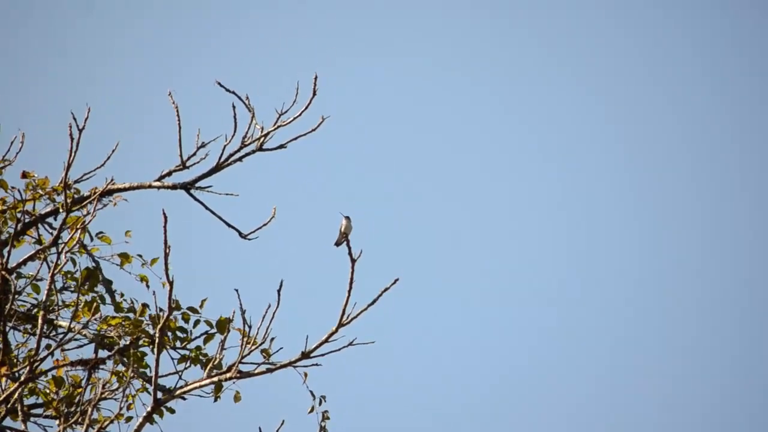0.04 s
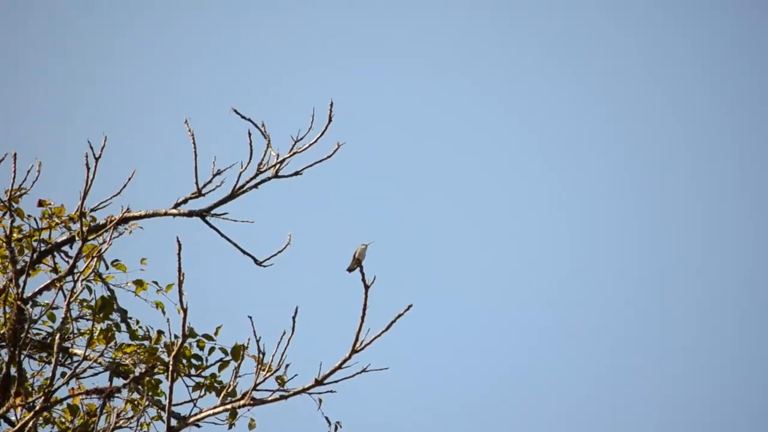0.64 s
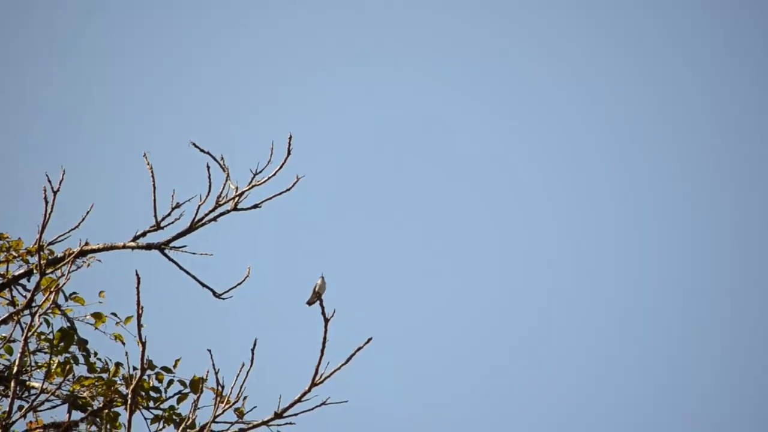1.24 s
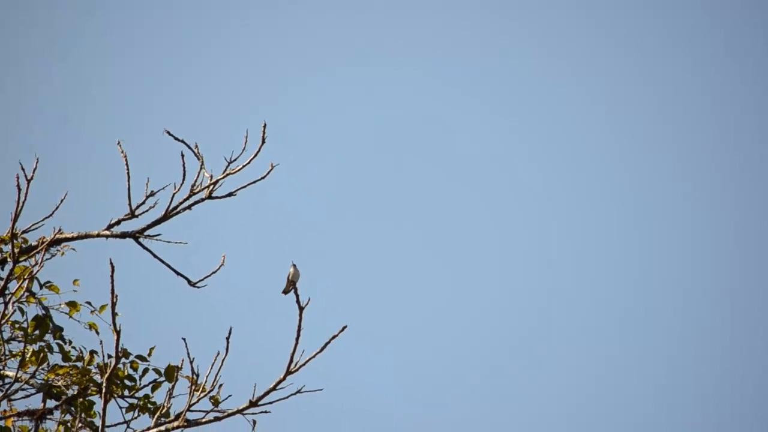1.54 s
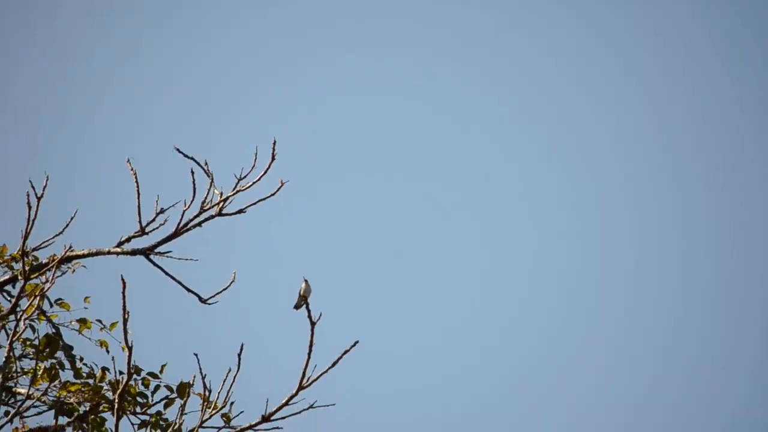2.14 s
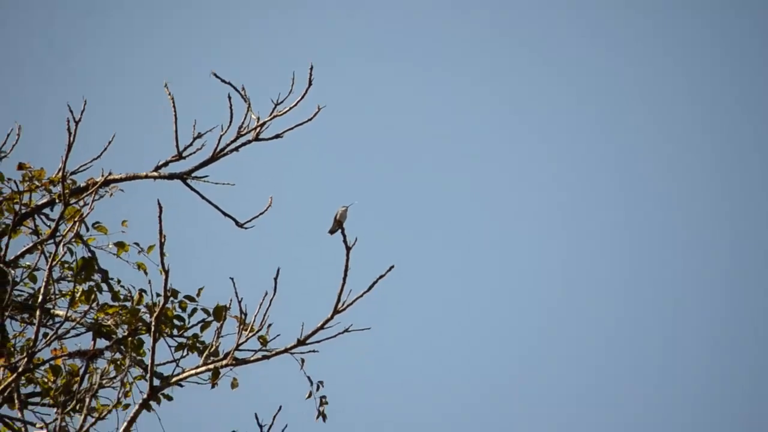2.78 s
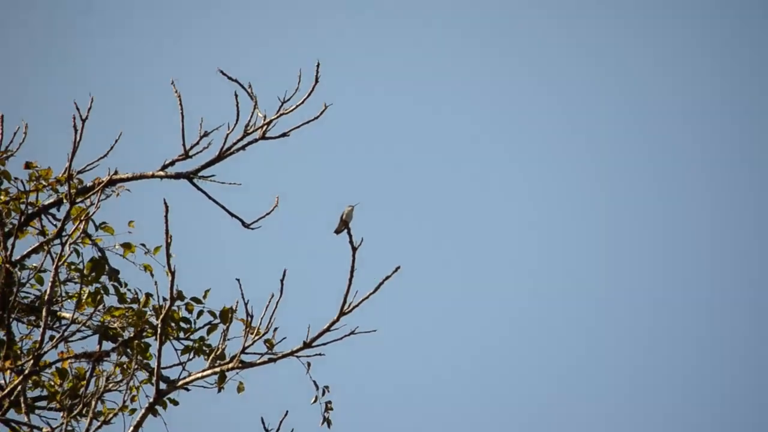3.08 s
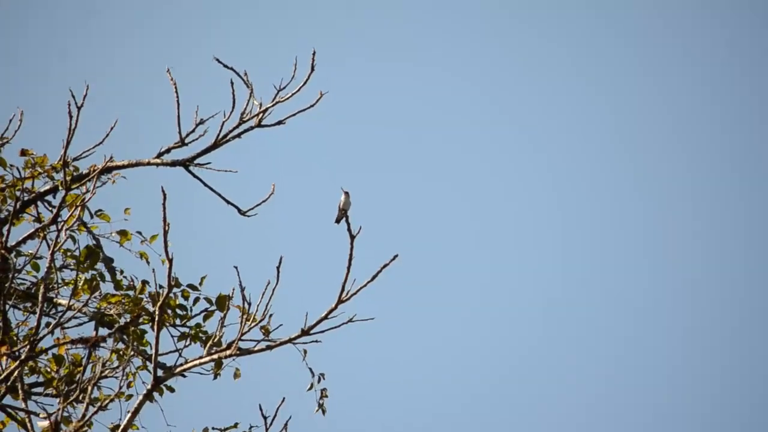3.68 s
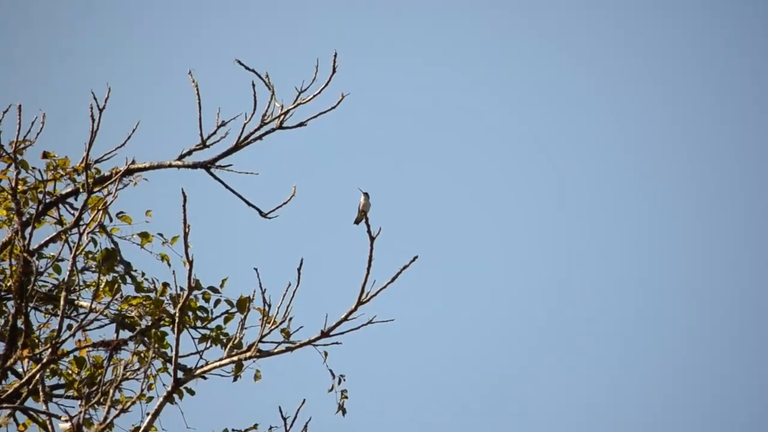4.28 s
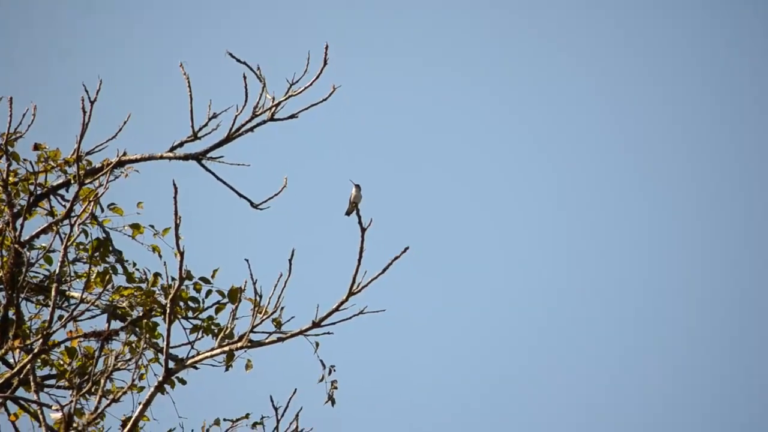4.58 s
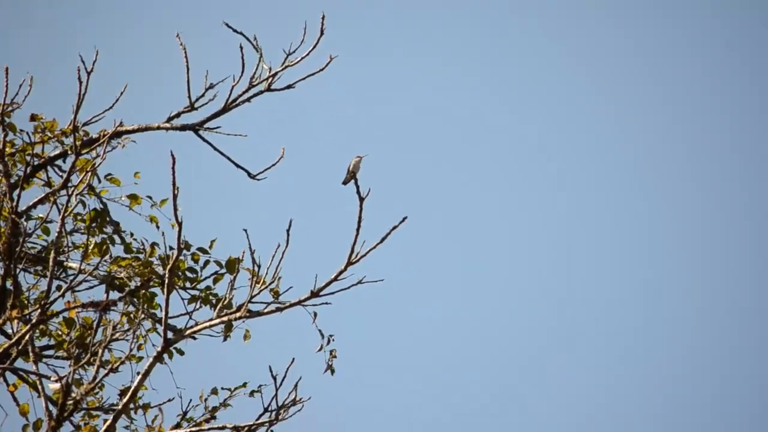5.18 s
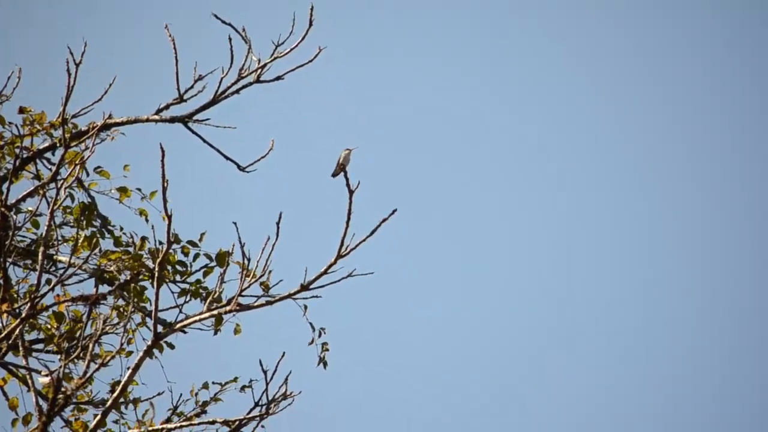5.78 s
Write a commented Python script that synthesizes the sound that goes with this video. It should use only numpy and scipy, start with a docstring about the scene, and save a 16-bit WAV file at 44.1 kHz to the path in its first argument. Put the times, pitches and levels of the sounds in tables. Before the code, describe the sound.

A perched hummingbird calls after about three seconds of quiet outdoor rush and faint far traffic. It makes one sharp, high buzz, then four thin, clean chips that drop in pitch, then two more sharp buzzes half a second apart. The trees add a light echo. The hand-held microphone contributes a faint hiss, a thin electronic whine and a few soft, low bumps.

```python
"""Outdoors among trees, a hand-held camera's microphone on a hummingbird perched on a bare twig.
After one faint call from afar, the bird gives a buzzy burst, four falling chips and two more bursts.
Each call is one thin whistle from the syrinx; in the bursts its pitch swings up and down ever more
slowly. The trees scatter a faint echo. Far behind lie an outdoor rush and a drone of traffic;
right at the microphone are its own hiss, the camera's whine and a few soft handling bumps."""
import sys
import numpy as np
from scipy import signal
from scipy.fft import rfft, irfft, next_fast_len
from scipy.io import wavfile
from scipy.ndimage import map_coordinates

SR = 44100
rng = np.random.default_rng(int(sys.argv[2]) if len(sys.argv) > 2 else 0)


def master(y):
    """Save y as 16-bit WAV."""
    cut = np.clip(np.atleast_2d(y).T, -1, 1)
    pcm = np.round(cut * 32767)  # scale
    wavfile.write(sys.argv[1], SR, pcm.astype(np.int16))


N = 261513


def amp(db):
    """Decibels to gain."""
    return 10 ** (np.asarray(db) / 20)


def unit(x):
    """Scale to rms 1."""
    return x / np.sqrt(np.mean(x ** 2) + 1e-20)


def along(points, hz):
    """Read (f/Hz, value) points on a log frequency axis."""
    f, v = np.transpose(points)
    return np.interp(np.log(hz + 1), np.log(f + 1), v)


def wobble(rate, size):
    """A smooth random curve, rate knots a second."""
    knots = rng.standard_normal(int(size * rate / SR) + 4)
    return map_coordinates(knots, [np.arange(size) * rate / SR])


def filtered(x, response):
    """Filter x by a gain given as a function of frequency."""
    m = next_fast_len(len(x) + 8192)
    return irfft(rfft(x, m) * response(np.fft.rfftfreq(m, 1 / SR)), m)[:len(x)]


def noise(spectrum, size):
    """Coloured noise of rms 1."""
    return unit(filtered(rng.standard_normal(size), lambda hz: amp(along(spectrum, hz))))


def band(hz, width_hz, size):
    """Narrow noise of rms 1."""
    return unit(filtered(rng.standard_normal(size), lambda f: np.exp(-((f - hz) / width_hz) ** 2 / 2)))


def ramp(t, length):
    """A smooth step from 0 to 1 that starts at t = 0."""
    return np.sin(np.pi / 2 * np.clip(t / length, 0, 1)) ** 2


def add(track, s, sound):
    """Mix a sound into the track at s seconds."""
    part = track[round(s * SR):][:len(sound)]
    part += sound[:len(part)]


# Spectrum of the rush, far from the microphone: f/Hz, relative level/dB
RUSH_SPECTRUM = [(15, -30), (28, -12.5), (75, -8.5), (130, -8), (240, -5.5), (330, -3), (490, -4.5),
                 (770, -3), (1200, -6), (1850, -11), (3900, -21), (4550, -22), (5400, -26), (5800, -42)]

def outdoors(rush_db=-54.5, sway_db=-0.16, traffic_db=-73.5, swell_db=7, peak_s=1.4, swell_s=0.74):
    """In the distance: a steady rush, and a low drone of traffic that swells once."""
    swell = np.exp(-((np.arange(N) / SR - peak_s) / swell_s) ** 2)
    traffic = amp(traffic_db + swell_db * swell) * band(hz=349, width_hz=38, size=N)
    rush = amp(rush_db + sway_db * wobble(3.3, N)) * noise(RUSH_SPECTRUM, N)
    return rush + traffic


# Spectrum of the microphone's own hiss: f/Hz, relative level/dB
HISS_SPECTRUM = [(4800, -17), (5400, -6), (5750, -8.5), (6050, 2.5), (6650, 3.5), (6900, -2), (7150, 3),
                 (8100, 2), (9000, -4), (11000, -8.5), (15000, -20)]
# Tones of the camera's electronics: f/Hz, rms level/dB
WHINE_TONES = [(3334, -81.5), (4163.4, -70.5), (6669, -82), (8331, -89.5)]

def camera_noise(hiss_db=-73.5):
    """At the microphone: hiss, and a thin electronic whine that drifts slightly in pitch."""
    drift = 1 + 0.00059 * wobble(8, N)
    whine = sum(np.sqrt(2) * amp(db) * np.sin(2 * np.pi * np.cumsum(hz * drift) / SR)
                for hz, db in WHINE_TONES)
    return amp(hiss_db) * noise(HISS_SPECTRUM, N) + whine


# Bumps of the hand on the camera: t/s, f/Hz, level/dB
HANDLING_BUMPS = [(.49, 48, -62), (3.115, 48, -56), (4.295, 50, -48), (4.319, 72, -40.5),
                  (4.362, 48.3, -52)]

def handling(width_cycles=0.66):
    """Each soft bump pushes the camera body once out and back."""
    out, t = np.zeros(N), np.arange(N) / SR
    for s, hz, db in HANDLING_BUMPS:
        cycles = hz * (t - s)
        out -= amp(db) * np.sin(2 * np.pi * cycles) * np.exp(-(cycles / width_cycles) ** 2)
    return out


# Notes of a faint call from afar: t/s, f/Hz, level/dB
FAR_NOTES = [(2.86, 7850, -70), (2.9, 8350, -74)]

def far_call(width_hz=350, t60=0.49):
    """Distance smears each note into a narrow band of echo before it reaches the microphone."""
    out, t = np.zeros(N), np.arange(SR // 2) / SR
    for s, hz, db in FAR_NOTES:
        add(out, s, amp(db - 60 * t / t60) * ramp(t, 0.0092) * band(hz, width_hz, len(t)))
    return out


def whistle(hz, overtone_db):
    """The syrinx: a tone of rms 1, plus its weaker octave."""
    phase = 2 * np.pi * np.cumsum(hz) / SR
    return np.sqrt(2) * (np.sin(phase) + amp(overtone_db) * np.sin(2 * phase))


# Spectrum of the ticks that open a burst: f/Hz, relative level/dB
TICK_SPECTRUM = [(500, -19), (1500, -3), (3000, -6), (5000, -14), (6500, -7), (8000, 4), (9500, -10),
                 (12000, -27), (15000, -31)]

def tick(t, width_s=0.0017, noise_db=-27, sweep_db=-38.5, sweep_hz=2462, rise_hz_per_s=240000):
    """A snap of noise with a faint upward sweep, centred on t = 0; levels are relative to the burst."""
    sweep = amp(sweep_db) * whistle(sweep_hz + rise_hz_per_s * t, overtone_db=-5)
    snap = amp(noise_db) * noise(TICK_SPECTRUM, len(t))
    return np.exp(-(t / width_s) ** 2 / 2) * (snap + sweep)


def trill(t, first_period_s=0.00365, slowing=0.029):
    """The buzz: a rounded triangular swing between 0 and 1, slightly uneven, whose period grows."""
    rate = (1 + 0.0325 * wobble(139, len(t))) / (first_period_s + slowing * np.maximum(t, 0))
    cycles = np.cumsum(rate * (t > 0)) / SR
    turn = np.arcsin(.95 * np.cos(2 * np.pi * cycles)) / np.arcsin(.95)
    return (1 - turn) / 2


# Level of a burst by pitch, strong up to 9 kHz and fainter above: f/Hz, relative level/dB
BURST_TILT = [(6000, -7), (7600, -6), (8500, -7), (9000, -5), (9600, -13.5), (10400, -20), (11200, -20.5),
              (12500, -25)]
# Bursts from the twig: t/s, base level/dB, opening f/Hz, lead before the trill/s, length/s
BURST_CALLS = [(3.397, -24, 7820, .022, 0.15), (5.042, -20.5, 7630, 0.0176, 0.14),
               (5.545, -22.5, 7570, .013, 0.14)]

def bursts(swing_hz=2650, trill_hz=8170, throat_hz=11400):
    """A tiny upward flick, a rising whistle, then a fast trill, loudest low in each swing."""
    flick_s, flick_hz, flick_hz_per_s, flick_db = 0.00204, 5880, 730000, -9
    main_s, climb_hz_per_s, creep_hz_per_s = 0.0055, 46500, 2600
    soft_db, swell_s, drop_db, fade_db_per_s = -5.5, 0.0035, -5.5, 48.5
    voice, ticks = np.zeros(N), np.zeros(N)
    for s, db, start_hz, lead, length in BURST_CALLS:
        t = np.arange(int(length * SR)) / SR
        in_trill = np.maximum(t - lead, 0)
        opening = in_trill / (in_trill + 0.005)  # the swing widens quickly, then ever more slowly
        swing = swing_hz * opening * trill(t - lead)
        stray_hz = 130 * opening * wobble(170, len(t)) + 35 * wobble(520, len(t))
        flick_pitch = flick_hz + flick_hz_per_s * (t - flick_s)
        climb_pitch = start_hz + climb_hz_per_s * (np.minimum(t, lead) - main_s)
        # every trill settles on the same lowest pitch, which creeps up
        settled = ramp(in_trill, 0.0047)
        main_pitch = (1 - settled) * climb_pitch + settled * (trill_hz + creep_hz_per_s * in_trill)
        hz = np.where(t < main_s, flick_pitch, main_pitch) + swing + stray_hz
        # effort swells, drops as the trill starts, then ebbs
        swell = soft_db * np.exp(-np.maximum(t - main_s, 0) / swell_s)
        effort = swell + drop_db * ramp(in_trill, 0.003) - fade_db_per_s * in_trill
        level = db + effort + along(BURST_TILT, hz) + 1.2 * opening * wobble(153, len(t))
        flick_gate = amp(flick_db) * ramp(t - flick_s, 0.0012) * ramp(main_s - t, 0.001)
        main_gate = ramp(t - main_s, 0.0013) * ramp(length - t, 0.0027)
        add(voice, s, amp(level) * (flick_gate + main_gate) * whistle(hz, overtone_db=-60))
        for when in (flick_s, flick_s + 0.0061):  # flick and main whistle each open with a tick
            add(ticks, s, amp(db) * tick(t - when))
    # the bird's throat passes little above the top of the swing
    return filtered(voice, lambda hz: 1 / np.sqrt(1 + (hz / throat_hz) ** 60)) + ticks


def tree_echo(x, delay_s, t60):
    """Leaves and branches scatter the call back to the microphone in a dying tail of unit energy."""
    t = np.arange(int(.6 * SR)) / SR
    tail = rng.standard_normal(len(t)) * ramp(t - delay_s, 0.0018) * amp(-60 * t / t60)
    return signal.fftconvolve(x, tail / np.linalg.norm(tail))[:N]


# A chip's octave, stronger on low notes: fundamental f/Hz, relative level/dB
CHIP_OCTAVE = [(6500, -35), (7100, -36), (7700, -49)]
# Chips from the twig: t/s, length/s, level/dB, opening f/Hz, fall/Hz, fall time constant/s,
# closing bend/Hz, hold before the fade/s
CHIP_CALLS = [ (3.783, .072, -36.5, 8060, 918, 0.029, 1007, .037),
              (4.055, 0.05, -38, 8160, 1240, 0.0192, 170, 0.05),
              (4.316, 0.058, -36, 7810, 1080, 0.031, -60, 0.027),
              (4.579, 0.058, -38.5, 7510, 858, 0.032, -520, 0.043), ]

def chips(waver_hz=18, flutter_db=1.5, bend_s=0.0099, soft_db=-9.5, swell_s=0.0045, fade_db_per_s=380):
    """Short clean whistles that start softly: the pitch sinks, levels out and bends as the note ends."""
    crack_s, crack_width_s, crack_db = 4.608, 0.0034, -22  # the voice breaks briefly in the last chip
    out = np.zeros(N)
    for s, length, db, start_hz, fall_hz, fall_s, bend_hz, hold in CHIP_CALLS:
        t = np.arange(int(length * SR)) / SR
        fall = fall_hz * (1 - np.exp(-t / fall_s))
        bend = bend_hz * np.exp((t - length) / bend_s)
        hz = start_hz - fall + bend + waver_hz * wobble(430, len(t))
        effort = soft_db * np.exp(-t / swell_s) - fade_db_per_s * np.maximum(t - hold, 0)
        crack = crack_db * np.exp(-((s + t - crack_s) / crack_width_s) ** 2)
        level = db + effort + crack + flutter_db * wobble(330, len(t))
        gate = ramp(t, 0.0017) * ramp(length - t, 0.0026)
        add(out, s, amp(level) * gate * whistle(hz, overtone_db=along(CHIP_OCTAVE, hz)))
    return out


def scene():
    """At one microphone: the bird, its echoes from near branches and farther trees, and the background."""
    bird = bursts() + chips()
    near = amp(-11) * tree_echo(bird, delay_s=0.0034, t60=0.14)
    # the long way through the air dulls the top of the far echo
    dulled = filtered(bird, lambda hz: 1 / np.sqrt(1 + (hz / 9200) ** 12))
    far = amp(-20) * tree_echo(dulled, delay_s=0.016, t60=0.59)
    return (bird + near + far + far_call() + outdoors() + camera_noise() + handling())[None]


def record(dry):
    """The camera keeps nothing above its band limit."""
    top_hz = 15500
    return np.array([filtered(channel, lambda hz: hz < top_hz) for channel in dry])


dry = scene()
out = record(dry)
master(out)
```